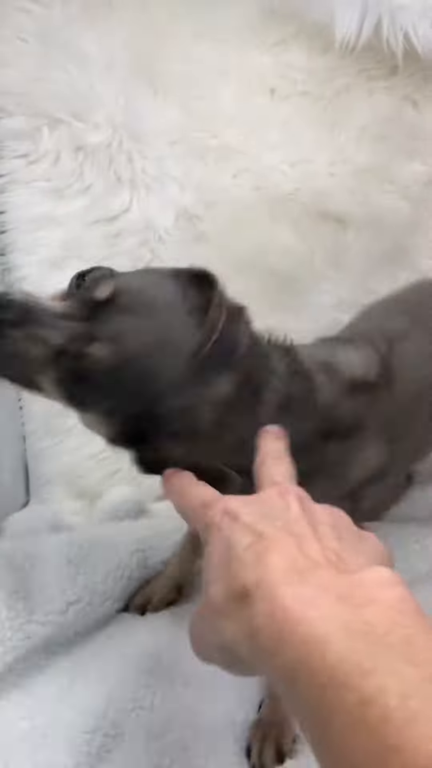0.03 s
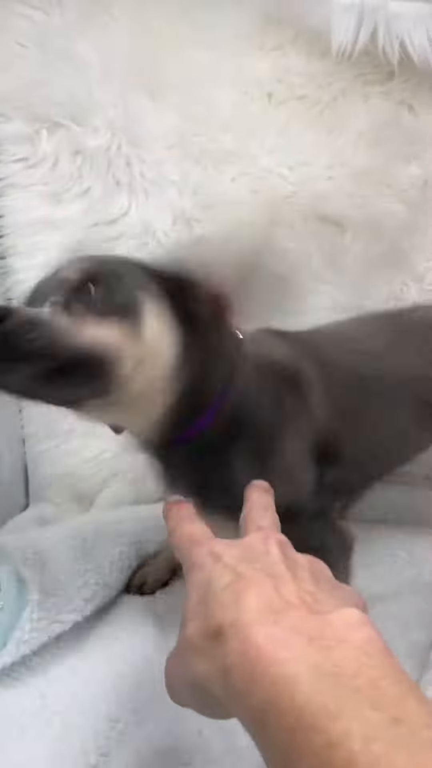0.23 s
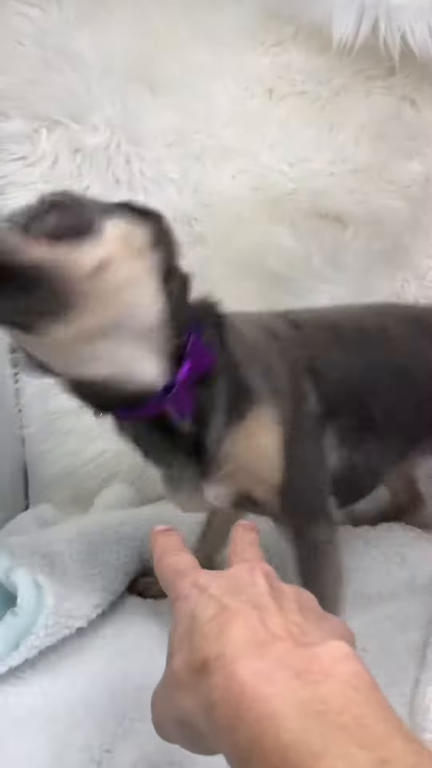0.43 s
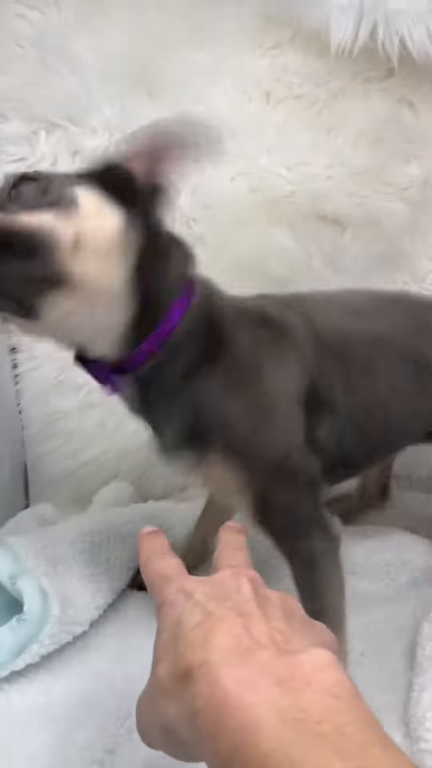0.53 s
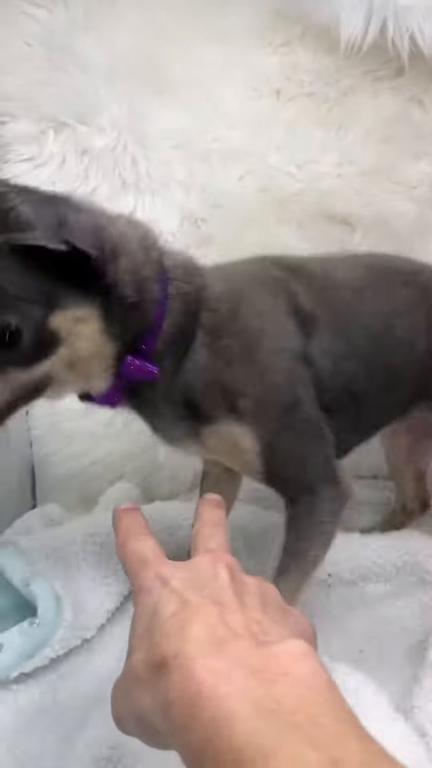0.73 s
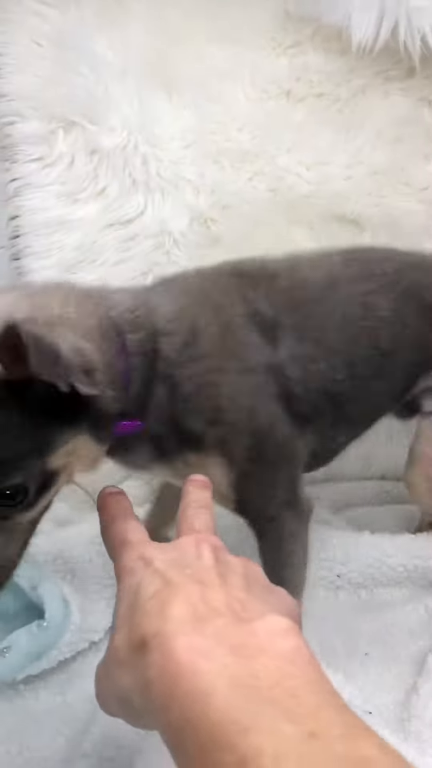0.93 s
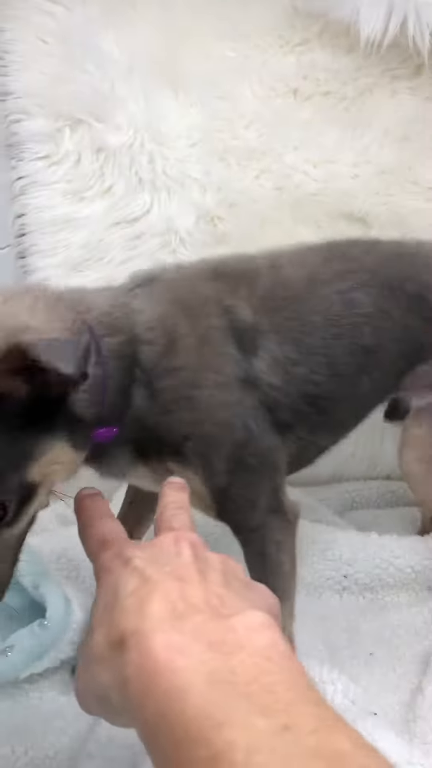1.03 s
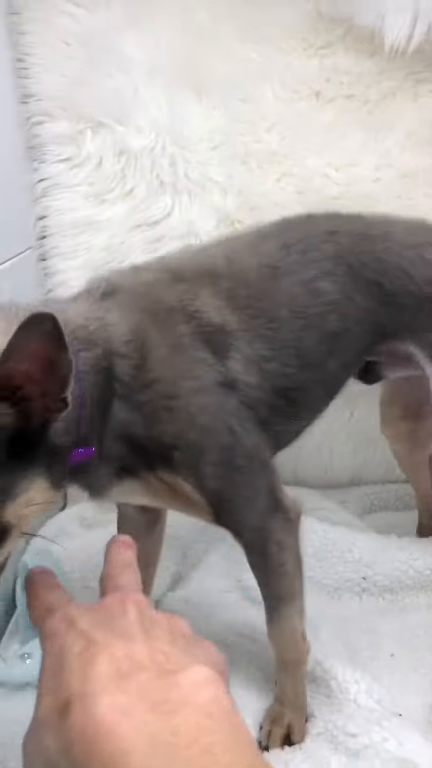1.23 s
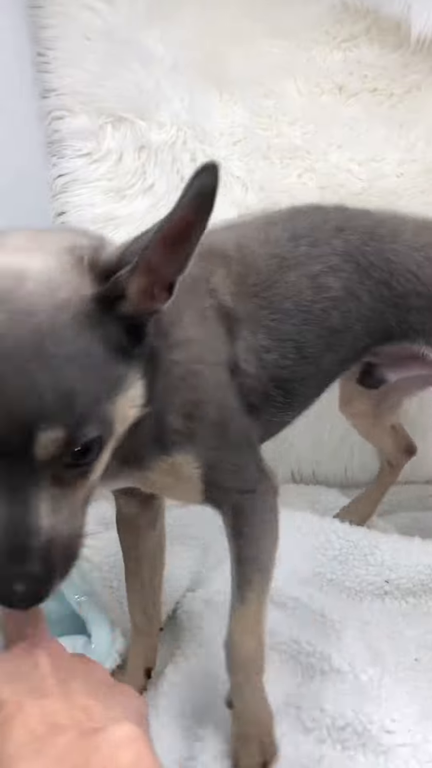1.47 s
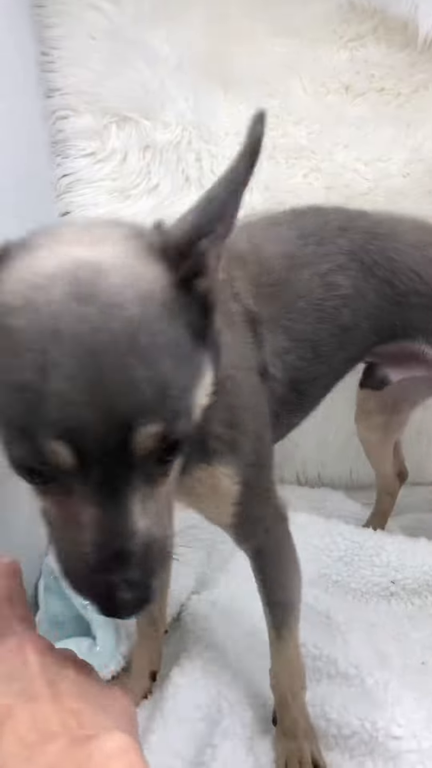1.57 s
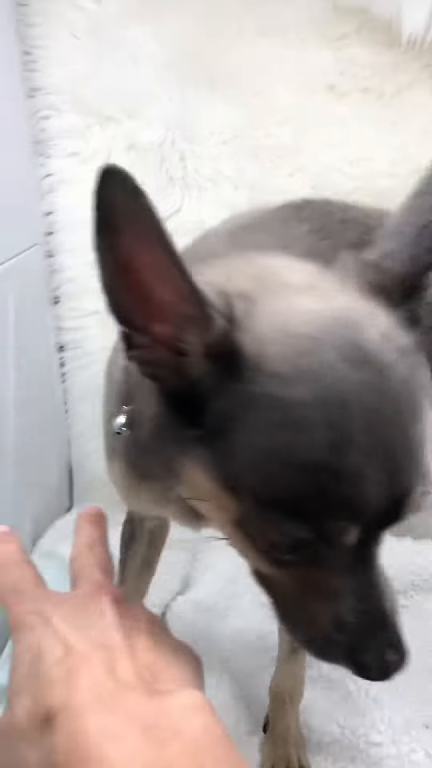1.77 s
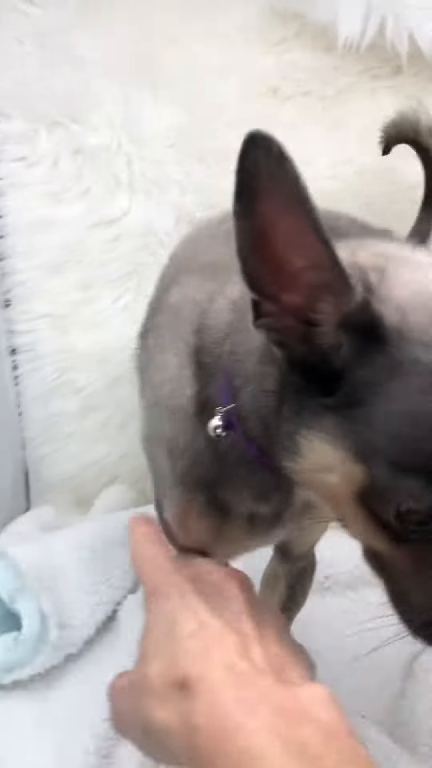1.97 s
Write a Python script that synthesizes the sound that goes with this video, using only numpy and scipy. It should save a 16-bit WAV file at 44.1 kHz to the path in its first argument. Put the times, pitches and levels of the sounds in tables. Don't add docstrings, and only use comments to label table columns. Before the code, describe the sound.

A small, high, thin collar bell jingles frantically from 0 to 0.8 seconds as a dog shakes, with buckle clinks, about nine rapid papery ear slaps until 0.6, loudest near 0.3, and low soft body thumps. From 0.8 to 1.3 the bell rings lighter and sparser, then tinkles almost inaudibly over blanket rustle and low room hum, with a faint paw tap at the end.

```python
import sys
import numpy as np
from scipy import signal
from scipy.fft import rfft, irfft
from scipy.io import wavfile
from scipy.ndimage import uniform_filter1d

SR = 44100
rng = np.random.default_rng(int(sys.argv[2]) if len(sys.argv) > 2 else 0)


def master(y):
    cut = np.clip(np.atleast_2d(y).T, -1, 1)
    pcm = np.round(cut * 32767)
    wavfile.write(sys.argv[1], SR, pcm.astype(np.int16))


def ratio_of_db(decibels):
    return 10 ** (np.asarray(decibels, float) / 20)


N = 88200

# start_s, peak_level_db, pitch_hz
HARD_SHAKE = [(0.0144, -29, 7650), (0.0174, -19, 7450), (0.0337, -26, 7950), (0.0389, -19.5, 7760),
              (0.0533, -40.5, 7680), (0.067, -21.5, 7490), (0.0853, -6.5, 7920), (0.0895, -2.5, 7780),
              (0.0987, -8.5, 7880), (0.1085, -32, 8050), (0.117, -29.5, 7530), (0.1383, -46, 8100),
              (0.15, -26, 8030), (0.178, -18, 7620), (0.1858, -26.5, 7840), (0.1955, -22, 7850),
              (0.203, -25.5, 7840), (0.2105, -26.5, 7740), (0.2196, -28, 7840), (0.2287, -33.5, 7500),
              (0.2504, -25.5, 7450), (0.2658, -30.5, 8100), (0.285, -40, 8000), (0.313, -16, 8000),
              (0.327, -33, 7100), (0.3282, -7, 7680), (0.3362, -18.5, 7640)]
SHAKE_DYING = [(0.3953, -13, 8270), (0.4074, -12, 7820), (0.4136, -12, 7820), (0.4201, -15, 7600),
               (0.432, -31, 7350), (0.463, -25.5, 8060), (0.4763, -9.5, 7870), (0.4969, -14.5, 7670),
               (0.503, -21.5, 8000), (0.5093, -19, 7770), (0.5345, -23.5, 7420), (0.546, -30, 8300),
               (0.5529, -6.5, 7760), (0.5592, -38, 7500), (0.5912, -39, 7600), (0.5988, -28.5, 7340),
               (0.6268, -22.5, 7540), (0.631, -25.5, 7920), (0.6434, -25.5, 7670), (0.6518, -25.5, 7680),
               (0.6665, -29, 7840), (0.674, -24.5, 7640), (0.6866, -15, 7820), (0.7178, -29.5, 7840),
               (0.7384, -29, 7920), (0.7559, -25, 7800), (0.7595, -21.5, 8080), (0.7759, -24.5, 7720),
               (0.7868, -40, 8170)]
TURNING = [(0.8275, -32, 7870), (0.847, -11, 7790), (0.86, -37, 7850), (0.8742, -22.5, 7980),
           (0.8902, -14, 7957), (0.906, -41.5, 7780), (0.9285, -44, 7930), (0.9352, -46, 7550),
           (0.9548, -33.5, 7900), (0.9779, -35.5, 7940), (1.0028, -32, 7810), (1.0085, -29.5, 8170),
           (1.0136, -27.5, 7630), (1.028, -28.5, 7870), (1.0403, -26.5, 7930), (1.0587, -25.5, 7850),
           (1.075, -34.5, 7920), (1.0959, -33, 7820), (1.1066, -30.5, 7860), (1.1205, -29, 7720),
           (1.1346, -51.5, 7720), (1.169, -26.5, 7740), (1.2211, -40, 7840), (1.2387, -58, 7740),
           (1.295, -53, 7940)]
SNIFFING = [(1.3163, -49, 7790), (1.3292, -38.5, 7730), (1.3338, -51, 7640), (1.381, -53.5, 8000),
            (1.4604, -66, 7930), (1.465, -45, 8140), (1.487, -50, 7750), (1.4954, -55, 7800),
            (1.516, -53, 7840), (1.5266, -55, 7360), (1.5348, -46, 7400), (1.5393, -50, 7730),
            (1.575, -44, 7800), (1.609, -51.5, 7700), (1.623, -38.5, 7500), (1.6279, -47, 7300),
            (1.6377, -40, 7940), (1.6452, -51, 8160), (1.688, -56, 7700), (1.702, -36.5, 7650),
            (1.7657, -66, 7860), (1.7992, -67, 7600), (1.867, -62.5, 8010), (1.8997, -71.5, 7590),
            (1.9205, -65, 8070), (1.951, -68, 7450), (1.9646, -70, 7500), (1.992, -66.5, 7600),
            (1.678, -63, 7900), (1.506, -62, 7470)]
RING_T60 = [0.037, 0.048, 0.09, 0.0305]
CHATTER_LEVEL = [-16, -18.5, -27, -25]
SIDE_MODE_LEVEL = [3.5, 1.5, -2, 5.5]
# ratio_to_struck_pitch, level_db, share_of_ring_time
BELL_MODES = [(.925, -17.5, 0.34), (0.969, -9, 0.83), (1.002, 4, 0.83), (1.035, -9.5, 0.5),
              (1.085, -29.5, 2.8)]
# start_s, peak_level_db
BUCKLE_CLINKS = [(0.0153, -44), (0.0829, -25), (0.0879, -36), (0.1755, -37), (0.2467, -36), (0.3261, -30.5),
                 (0.3884, -25), (0.3939, -23), (0.4624, -33), (0.4742, -30), (0.4947, -35.5),
                 (0.5326, -28.5), (0.555, -36), (0.5915, -28.5), (0.6299, -55), (0.6518, -45),
                 (0.6842, -53), (0.7072, -40), (0.7361, -48), (0.7591, -48), (0.825, -44), (0.8455, -44.5),
                 (0.8599, -37), (0.8684, -47), (0.8736, -38), (0.8884, -44.5), (0.9536, -44), (0.9776, -53),
                 (1.0075, -54), (1.0265, -63), (1.037, -49), (1.0537, -48), (1.0853, -62), (1.0944, -55),
                 (1.1053, -53.5), (1.1184, -59), (1.1661, -61), (1.217, -64), (1.2374, -68),
                 (1.5164, -60.5), (1.6216, -62.5), (1.6366, -63), (1.702, -55)]
# start_s, peak_level_db, centre_hz, length_s, treble_share_db
EAR_SLAPS = [
    (0.015, -28.5, 2490, 0.0031, -9),
    (0.07, -22, 3850, 0.0036, -0.5),
    (0.149, -18.5, 2500, 0.0028, -7),
    (0.2266, -22, 2650, 0.0042, -13),
    (0.3043, -4.5, 3780, 0.002, -10),
    (0.378, -12.5, 3330, 0.0028, -13.5),
    (0.4519, -11.5, 5320, 0.001, -1),
    (0.5182, -20.5, 3080, 0.0052, -9),
    (0.5885, -30.5, 3100, 0.0038, -13),
]
# start_s, peak_level_db, centre_hz
FOOTFALLS = [
    (.714, -41.5, 1040),
    (0.797, -39, 1056),
    (1.087, -52.5, 890),
    (1.9945, -42.5, 1600),
    (1.9955, -41, 780),
]
# start_s, peak_level_db, pitch_hz, t60_s
BODY_THUMPS = [
    (0.104, -34, 372, 0.052),
    (0.149, -27.5, 102, 0.05),
    (0.302, -27, 146.3, 0.081),
    (.373, -31.5, 267.5, 0.087),
    (0.391, -25, 90.2, 0.05),
    (0.448, -26, 113, 0.07),
    (0.461, -31.5, 71, 0.21),
    (0.521, -33.5, 290, .07),
    (0.575, -23.5, 120, 0.13),
]
# time_s, level_db
MOVEMENT = [
    (0, -53),
    (.3, -50.5),
    (0.502, -51),
    (.62, -56),
    (.9, -65),
    (1.15, -70.5),
    (1.3, -82.5),
]
# frequency_hz, level_db_per_hz
RUSTLE_SPECTRUM = [(250, 16), (1000, -17), (3000, -10), (7500, -1.5), (16000, -12)]
# start_s, peak_level_db, centre_hz
FUR_FLICKS = [
    (0.2176, -34, 2820),
    (.369, -32, 2480),
    (.39, -28.5, 910),
    (0.653, -53, 1210),
    (.763, -50, 1500),
    (0.883, -49.5, 2090),
    (0.9527, -53.5, 2050),
    (1.027, -49, 4420),
    (1.0768, -54, 2000),
    (1.136, -53, 2400),
]
# centre_s, level_db, length_s
BLANKET_SHIFTS = [
    (1.106, -71, 0.085),
    (1.4, -69, 0.16),
    (1.797, -68.5, .08),
]
# frequency_hz, level_db_per_hz
ROOM_SPECTRUM = [(25, -21.5), (70, -2.5), (170, -17), (290, -13.5), (490, -25), (2100, -50.5),
                 (7700, -51.5), (16000, -63.5)]


def level(x, db):
    return x * ratio_of_db(db) / np.sqrt(np.mean(x ** 2))


def band(x, hz, width):
    return signal.lfilter(*signal.iirpeak(hz, hz / width, SR), x)


def steep(x, hz, width):
    return band(band(x, hz, width), hz, width)


def colour(points):
    hz, db = np.array(points, float).T
    f = np.maximum(np.arange(N // 2 + 1) * SR / N, 1)
    low_cut = np.minimum(f / hz[0], 1) ** 2
    gain = ratio_of_db(np.interp(np.log(f), np.log(hz), db)) * low_cut
    return level(irfft(rfft(rng.standard_normal(N)) * gain, N), 0)


def walk(rate):
    k = int(SR / rate)
    held = np.repeat(rng.standard_normal(N // k + 1), k)
    return 1.6 * uniform_filter1d(uniform_filter1d(held, k), k)[:N]


def add(out, s, x):
    i = int(s * SR)
    out[i:i + len(x)] += x[:max(len(out) - i, 0)]


def fade(t, t60, rise):
    return np.exp(-np.log(1000) * t / t60) * (1 - np.exp(-t / rise))


def ring(t, hz, t60, rise):
    return np.sin(2 * np.pi * hz * t) * fade(t, t60, rise)


def bell():
    strike_db, bounce_db, scatter_db, choke_db, tick_db = -1.34, -17.5, 2.5, -9, -15.5
    bounce_gap_s, hold_s, rise_s = 0.0099, 0.0058, 0.0009
    home_hz, bend = 7840, 0.7
    tones, chatter, t = np.zeros(N), np.zeros(N), np.arange(4096) / SR
    ratio, mode_db, share = np.array(BELL_MODES).T
    is_side = mode_db < -3
    strikes = (HARD_SHAKE, SHAKE_DYING, TURNING, SNIFFING)
    for rows, t60, chatter_db, side_db in zip(strikes, RING_T60, CHATTER_LEVEL, SIDE_MODE_LEVEL):
        for s, db, hz in rows:
            luck, gaps = rng.standard_normal((3, 2, len(ratio))), rng.random((3, 2))
            struck_hz = home_hz + bend * (hz - home_hz)
            for k in range(3):
                scatter = (side_db + scatter_db * luck[k, 0]) * is_side
                gain = ratio_of_db(mode_db + scatter) * np.sign(luck[k, 1])
                modes_hz = struck_hz * ratio * (1 + 0.0049 * luck[k, 1])
                choke_s = hold_s * (1.09 + 0.45 * gaps[k, 1])
                choke = ratio_of_db(choke_db / (1 + np.exp((choke_s - t) / 0.0036)))
                hit = choke * (ring(t[:, None], modes_hz, t60 * share, rise_s) @ gain)
                delay = k * bounce_gap_s * (0.5 + gaps[k, 0])
                add(tones, s - rise_s + delay, ratio_of_db(strike_db + db + (k > 0) * bounce_db) * hit)
            add(chatter, s - rise_s, ratio_of_db(0.64 * db + chatter_db) * fade(t, t60, rise_s))
    grit = chatter * rng.standard_normal(N) * ratio_of_db(3.6 * walk(500))
    shell_band = signal.butter(3, [6950, 8650], "band", fs=SR, output="sos")
    shell = 2.4 * signal.sosfilt(shell_band, grit)
    ticks = ratio_of_db(tick_db) * steep(grit, 12000, 8500)
    return tones * ratio_of_db(1.7 * walk(450)) + shell + ticks


def buckle():
    clink_db, low_db = 1.5, -5.5
    out, t = np.zeros(N), np.arange(600) / SR
    shape = np.exp(-t / 0.0019) * (1 - np.exp(-t / 0.0002))
    for s, db in BUCKLE_CLINKS:
        noise = rng.standard_normal(len(t)) * shape
        high = steep(noise, 11100, 9000)
        low = ratio_of_db(low_db) * steep(noise, 6300, 3000)
        add(out, s + 0.0003, ratio_of_db(db + clink_db) * (high + low) / np.abs(high).max())
    return out


def ears():
    slap_db, body_db, tail_db, knock_db = -1.5, -15, -17, -25.5
    out, t = np.zeros(N), np.arange(3000) / SR
    for s, db, hz, length, treble_db in EAR_SLAPS:
        noise = rng.standard_normal((4, len(t)))
        shape = np.exp(-t / length) * (1 - np.exp(-t / 0.0008))
        crackle = noise[0] * ratio_of_db(4.47 * noise[1]) * shape
        snap = steep(crackle, hz, 1.07 * hz)
        bright_air = ratio_of_db(treble_db) * steep(crackle, 10000, 8500)
        hit = (snap + bright_air) / np.abs(snap).max() + 0.48 * ring(t, hz, 0.0073, 0.00028)
        tail = ratio_of_db(tail_db) * np.exp(-t / 0.028)
        body = steep(noise[2], 1700, 2900) * (shape + tail)
        add(out, s, ratio_of_db(db + slap_db) * hit + ratio_of_db(body_db + 0.5 * db) * body)
        knock = steep(noise[3] * np.exp(-t / 0.0088), 650, 1300)
        add(out, s, ratio_of_db(knock_db + 0.5 * db) * knock / np.abs(knock).max())
    return out


def paws():
    out, t = np.zeros(N), np.arange(6000) / SR
    partials = ((0.52, 1.5), (1, 0.98), (1.53, 0.62))
    for s, db, hz in FOOTFALLS:
        tick = sum(gain * ring(t, hz * ratio, 0.021, 0.0013) for ratio, gain in partials)
        add(out, s, ratio_of_db(db + 1.5) * tick)
    for s, db, hz, t60 in BODY_THUMPS:
        sag = 1 + 0.15 * np.exp(-t / 0.015)
        add(out, s, ratio_of_db(db + 4.5) * ring(t, hz * sag, t60, 0.0021))
    return out


def flicks():
    out, t = np.zeros(N), np.arange(600) / SR
    for s, db, hz in FUR_FLICKS:
        flick = steep(rng.standard_normal(len(t)) * np.exp(-t / 0.0019), hz, 0.6 * hz)
        add(out, s, ratio_of_db(db) * flick / np.abs(flick).max())
    return out


def fur():
    effort = ratio_of_db(np.interp(np.arange(N) / SR, *np.array(MOVEMENT).T))
    rumble = level(band(rng.standard_normal(N), 163, 150), 6.5) * ratio_of_db(2.0 * walk(17))
    rustle = colour(RUSTLE_SPECTRUM) * ratio_of_db(4.3 * walk(75))
    return effort * (rustle + rumble)


def blanket():
    t = np.arange(N) / SR
    swells = sum(ratio_of_db(db) * np.exp(-((t - s) / length) ** 2) for s, db, length in BLANKET_SHIFTS)
    cloth = level(band(rng.standard_normal(N), 1755, 1700), 0) * ratio_of_db(1.57 * walk(80))
    return swells * cloth


def room():
    t = np.arange(N) / SR
    dull_air = ratio_of_db(-48 + 0.5 * walk(5.7)) * colour(ROOM_SPECTRUM)
    hum = level(np.sin(2 * np.pi * 119.1 * t) * ratio_of_db(1.1 * walk(20)), -48.5)
    drone = level(steep(rng.standard_normal(N), 115, 55), -52.5)
    air_opens = 1 / (1 + np.exp((1.8 - t) / 0.027))
    high_air = level(steep(rng.standard_normal(N), 13500, 5000), -84) * air_opens
    return dull_air + hum + drone + high_air


def scene():
    echo_db, echo_t60_s = -18.5, 0.15
    near = bell() + buckle() + ears() + paws() + flicks()
    t = np.arange(int(0.25 * SR)) / SR
    echo = rng.standard_normal(len(t)) * np.exp(-np.log(1000) * t / echo_t60_s) * (t > 0.003)
    wet = signal.fftconvolve(near, echo / np.sqrt(np.sum(echo ** 2)))[:N]
    return (near + ratio_of_db(echo_db) * wet + fur() + blanket() + room())[None]


def band_limit(x):
    return signal.sosfilt(signal.butter(12, 16800, fs=SR, output="sos"), x)


def record(dry):
    top_cut = signal.ellip(8, 0.2, 60, 15900, fs=SR, output="sos")
    return band_limit(signal.sosfilt(top_cut, dry))


dry = scene()
out = record(dry)
master(out)
```